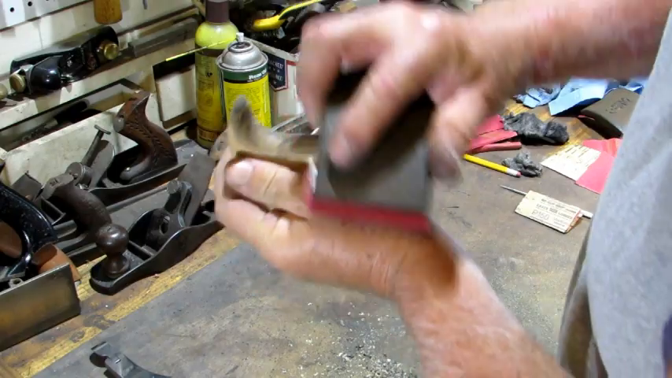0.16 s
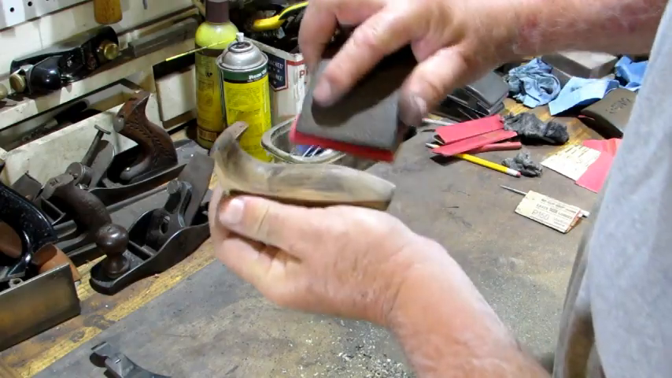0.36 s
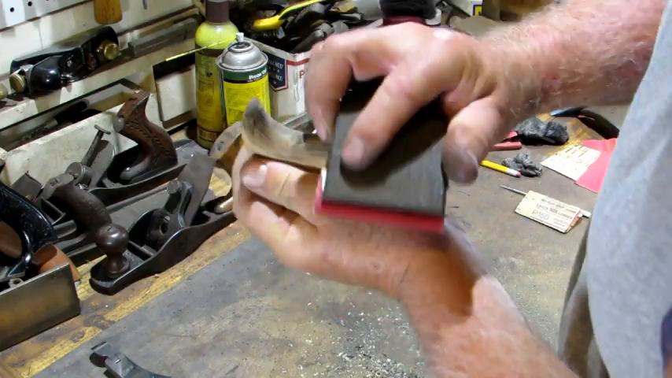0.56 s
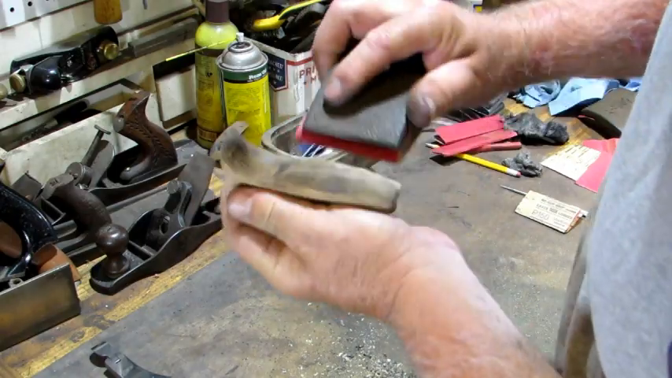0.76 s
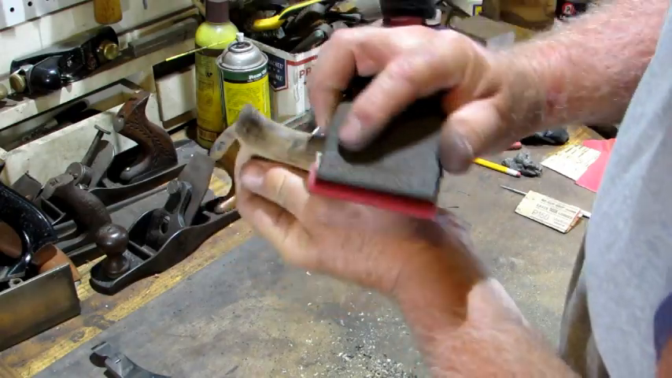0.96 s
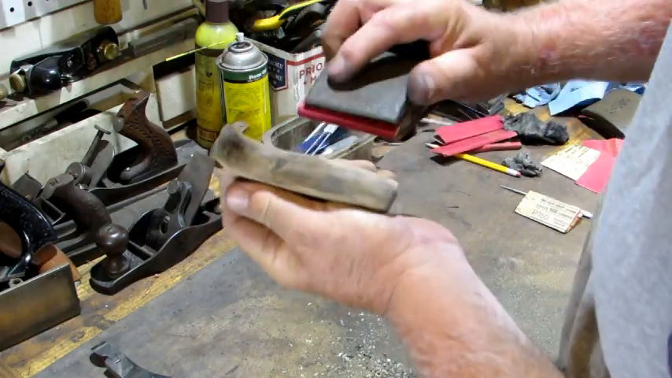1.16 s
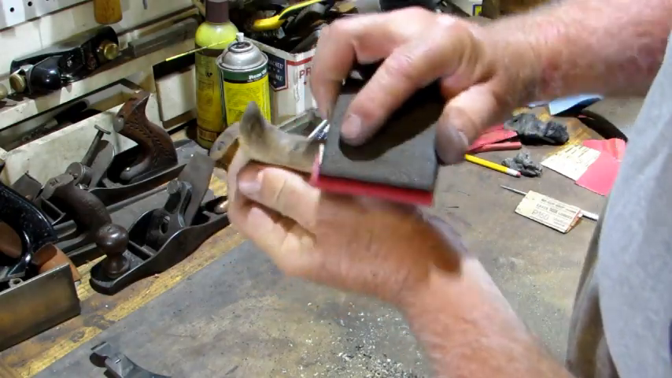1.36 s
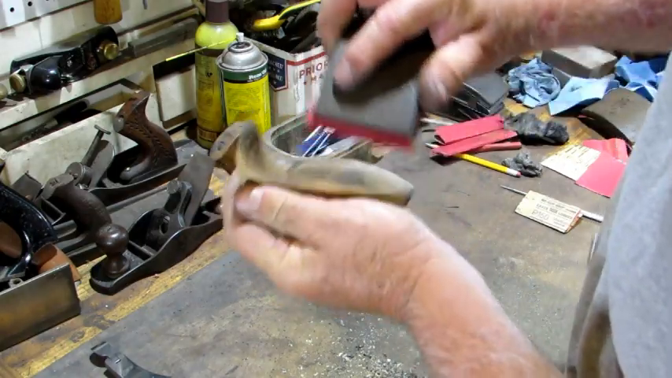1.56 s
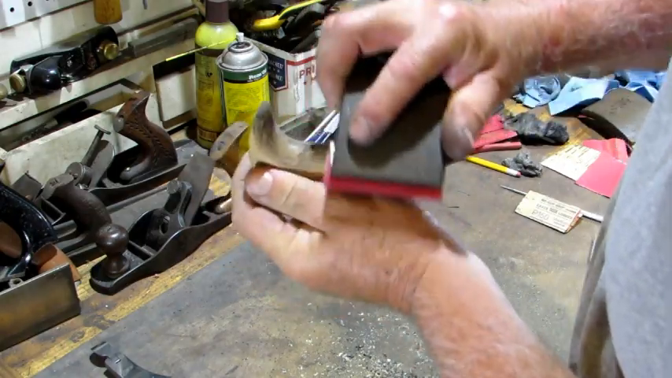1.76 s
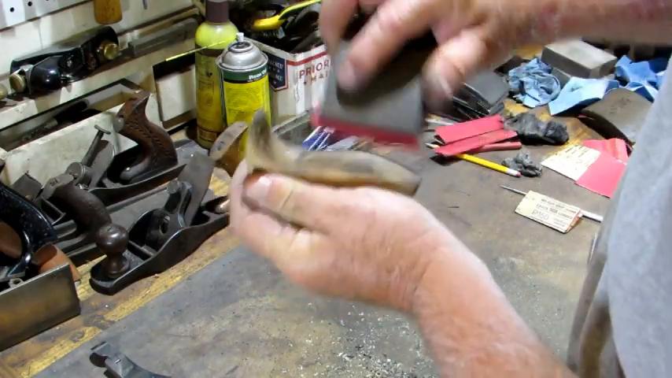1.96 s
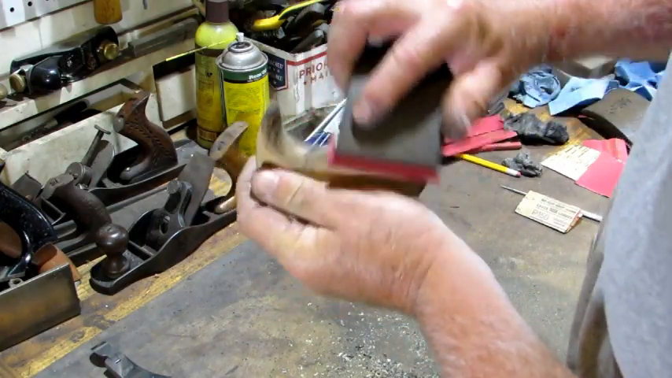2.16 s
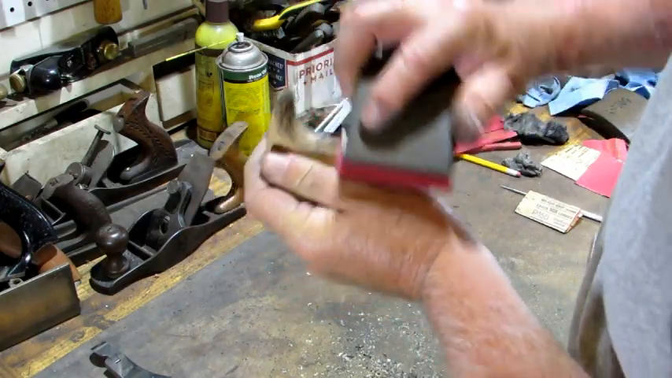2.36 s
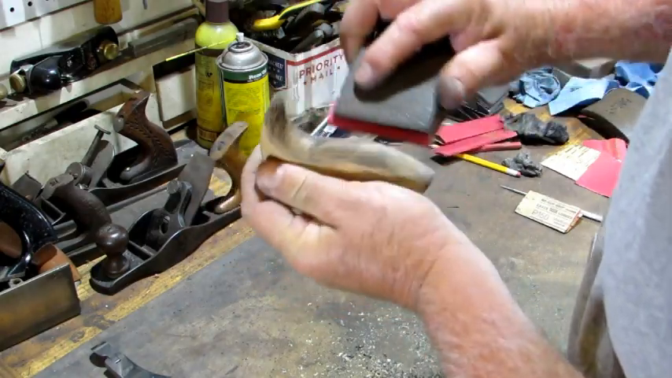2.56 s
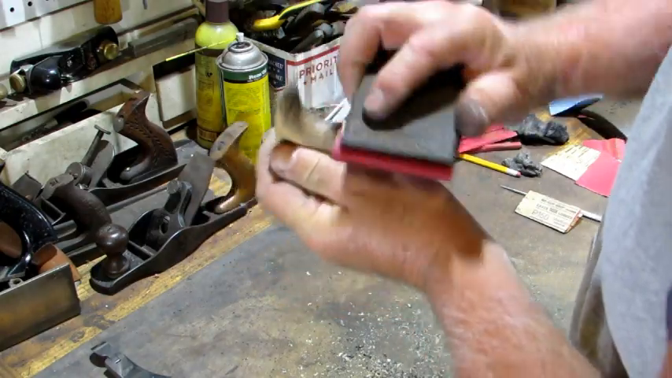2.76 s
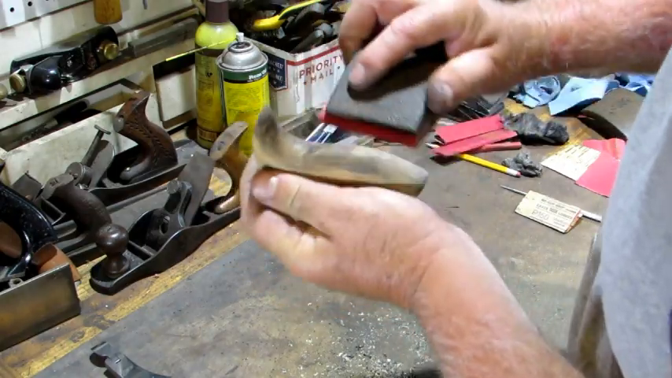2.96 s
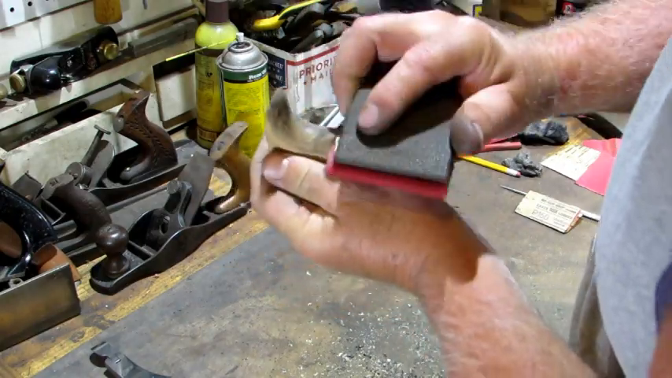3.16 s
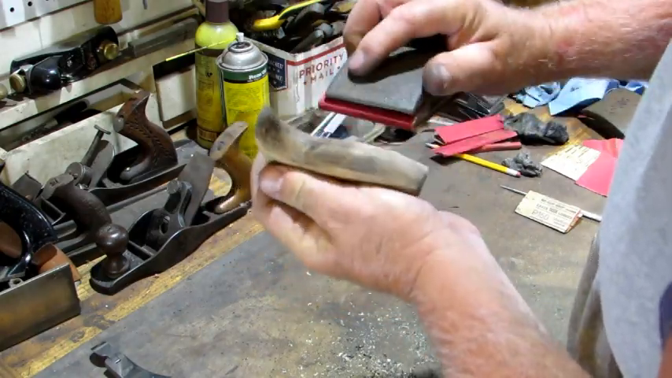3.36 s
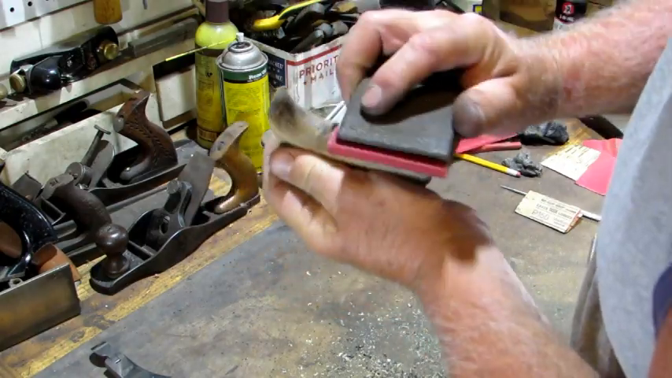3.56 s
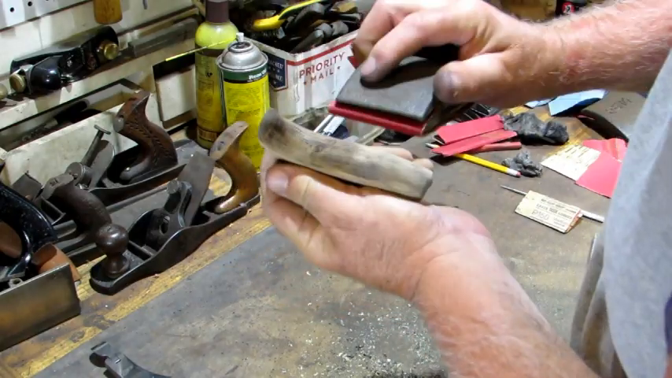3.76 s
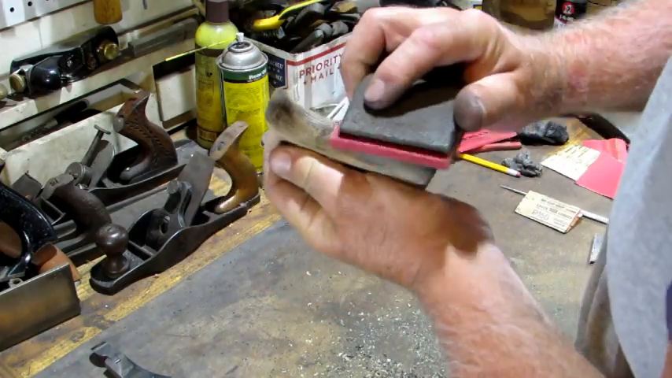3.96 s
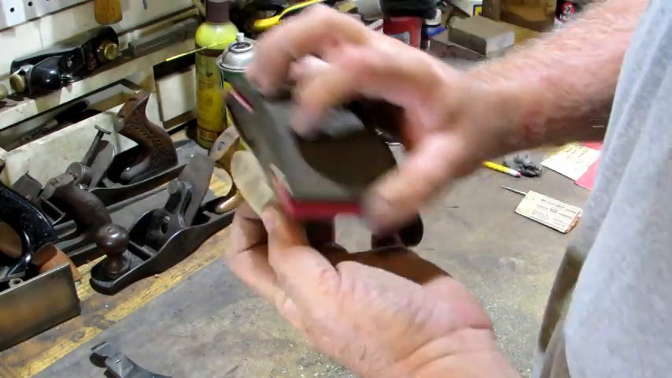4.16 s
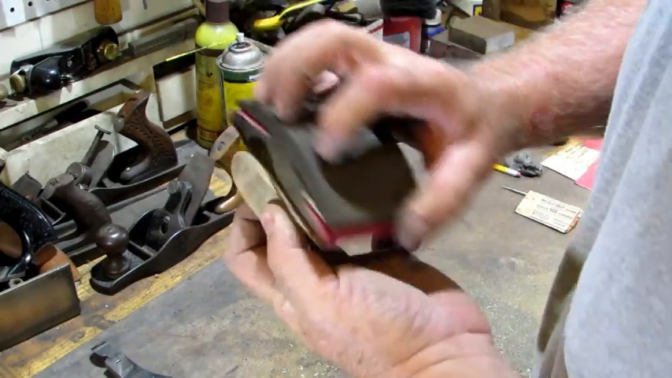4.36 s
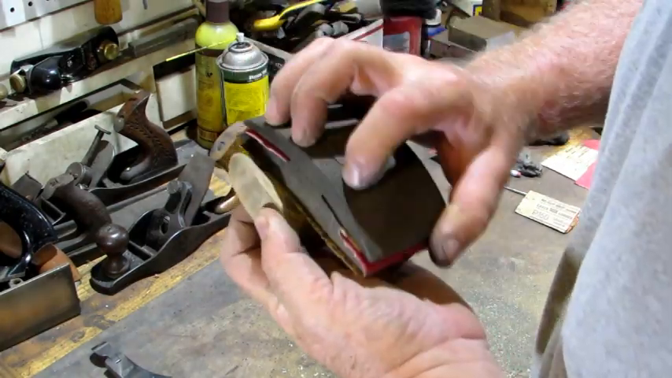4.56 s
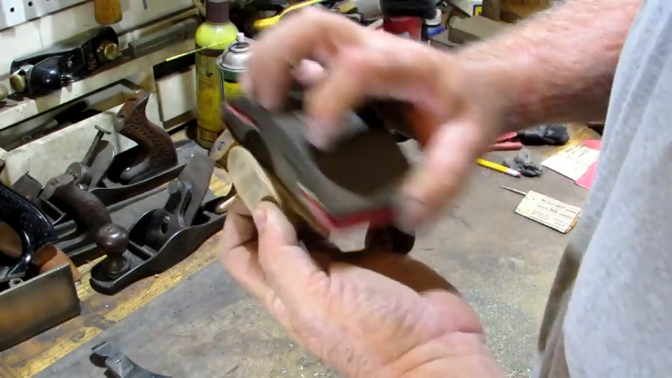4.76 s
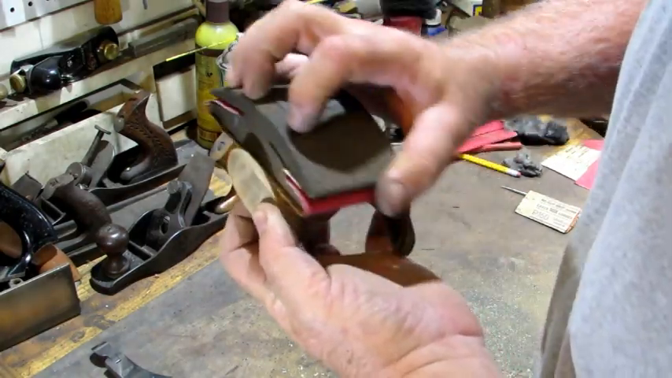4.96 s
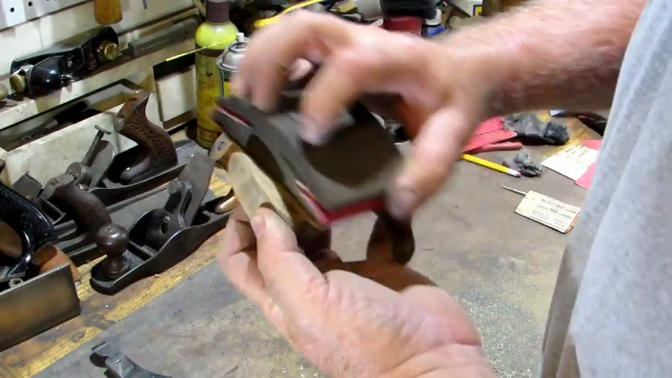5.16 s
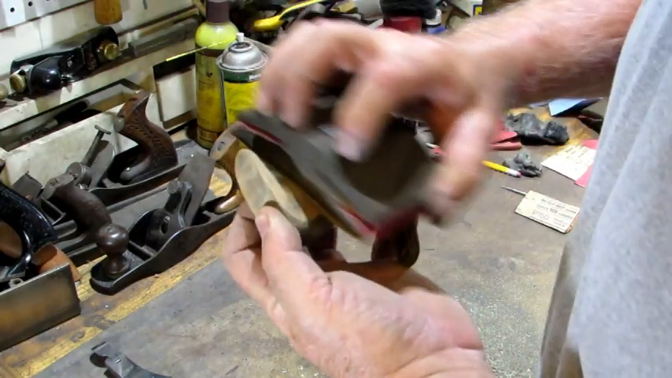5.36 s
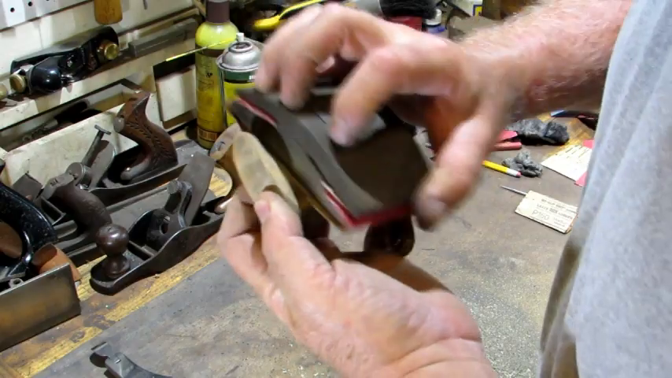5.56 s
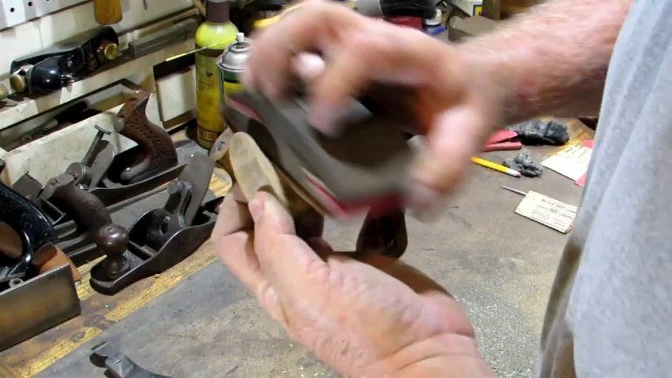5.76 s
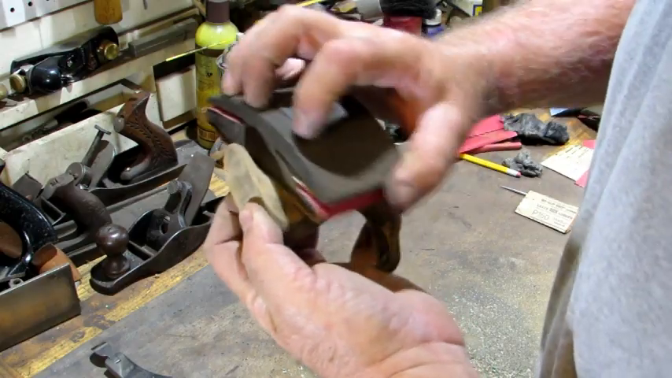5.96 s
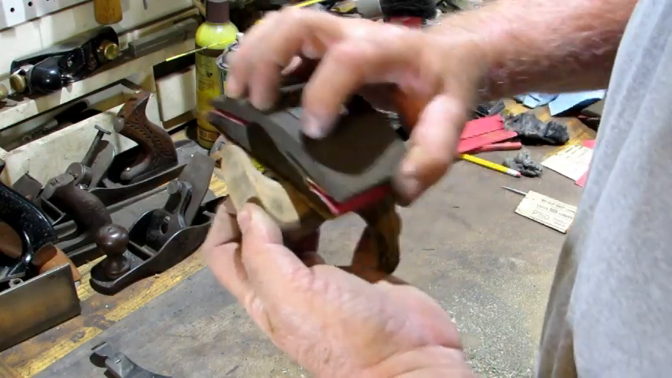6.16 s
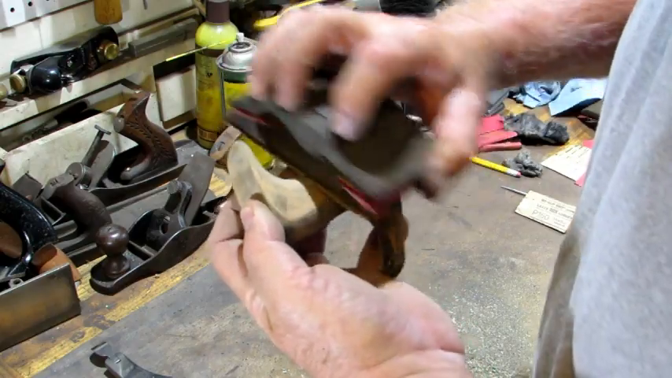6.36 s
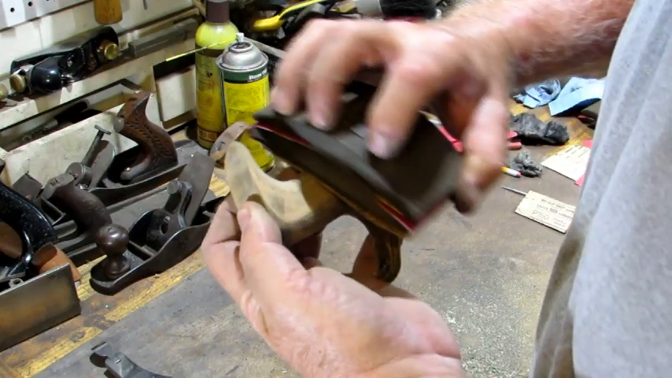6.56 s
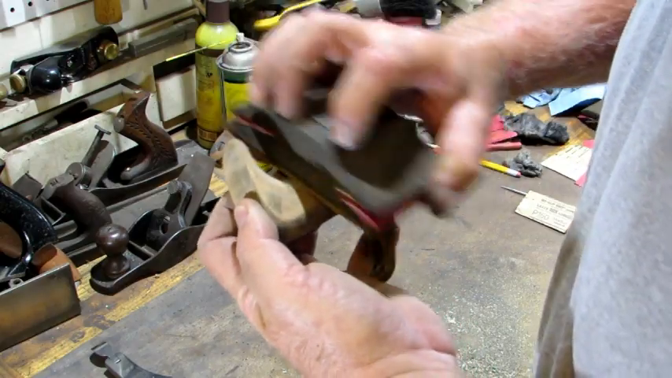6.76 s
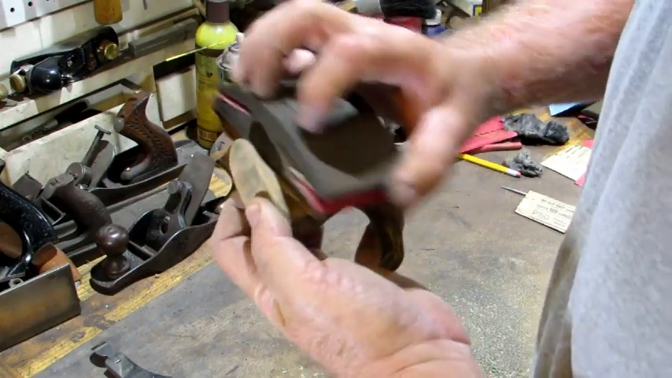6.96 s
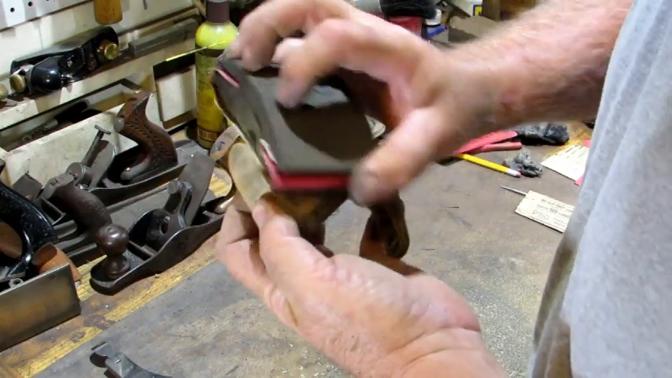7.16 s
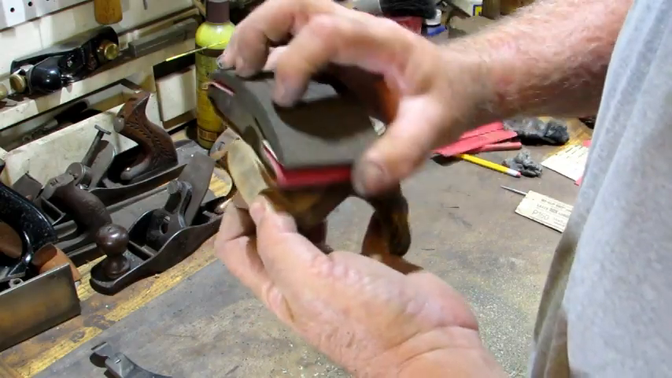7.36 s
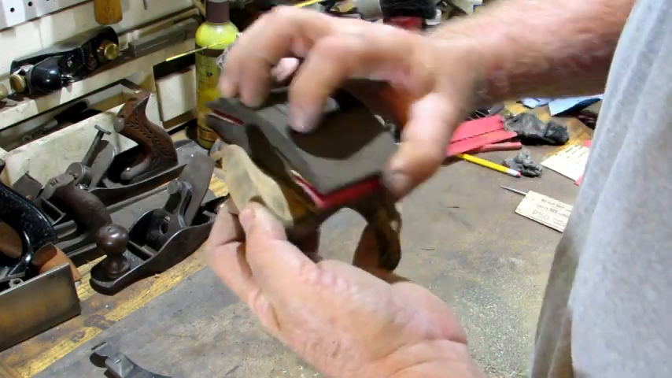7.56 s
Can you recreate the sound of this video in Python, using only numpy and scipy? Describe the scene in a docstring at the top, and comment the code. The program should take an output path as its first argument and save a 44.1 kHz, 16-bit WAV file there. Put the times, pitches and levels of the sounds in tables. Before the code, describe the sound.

Sandpaper on a rubber block rasps over hardwood in paired strokes, then abruptly switches to quick continuous scrubbing, above a steady fan hum.

```python
"""A small workshop, close to the hands: sandpaper on a rubber block rubs a hand-held piece of hardwood. A brief
stroke dies away, then pushes and pulls over the face come in pairs with short gaps, many opening with a knock
as the block lands; a hard cut, echo and all, leads to quick scrubbing on the edge. Random grains make a fine
hiss and a coarse rasp that rings at the wood's resonances. Noise tails answer from the walls, and a fan hums
throughout in tones over rushing air."""
import sys
import numpy as np
from scipy import signal
from scipy.fft import rfft, irfft, next_fast_len
from scipy.io import wavfile
from scipy.ndimage import uniform_filter1d, map_coordinates

SR = 44100
rng = np.random.default_rng(int(sys.argv[2]) if len(sys.argv) > 2 else 0)


def generate_wav(signal):
    """Clip the signal to [-1, 1] and save it as 16-bit WAV at the path in sys.argv[1]."""
    frames = np.transpose(np.atleast_2d(signal))
    scaled = np.clip(frames, -1, 1) * 32767
    pcm = np.round(scaled).astype(np.int16)
    wavfile.write(sys.argv[1], SR, pcm)


N = 336483

# passes over the face: push start t/s, pull start t/s, push force/dB, pull force/dB,
# push bite/dB, pull bite/dB (force is relative; bite is the hiss gained over the rasp)
FACE_STROKES = [(0.146, 0.251, -0.5, 2, -1, 0.5), (0.51, 0.621, -3, 0.9, 0, 2.5),
                (0.889, 0.994, 1, 0, 0, 0.5), (1.245, 1.356, 3, -1, 1.5, 0.5),
                (1.622, 1.725, 0.5, -2, -0.5, -1), (1.992, 2.104, 0.5, 1.5, 1, 1),
                (2.371, 2.479, -0.5, 3.5, 1.5, 0), (2.738, 2.836, -1.5, 1.5, -2.5, 1.5),
                (3.099, 3.198, -2, -1, 0, 1), (3.452, 3.565, 1, -2, 0, 1.5),
                (3.828, 3.948, 2.5, -2, -1, 2.5)]
# manner of a push over the face: rasp and hiss level/dB at usual force, hiss_follows (dB per dB of force),
# crest (0-1 of the stroke), sharpness of the swell, tilt (dB/octave), flare_db (tremble of the hand, dB)
FACE_PUSH_MANNER = dict(rasp_db=-26.6, hiss_db=-23.0, hiss_follows=0.3, rasp_crest=0.27, hiss_crest=0.18, rasp_sharp=1.23, hiss_sharp=1.5, rasp_tilt=-1.4, hiss_tilt=-0.8, flare_db=0.6)


def amp(db):
    """Decibels to gain."""
    return 10 ** (np.asarray(db) / 20)


def unit(x):
    """Scale to rms 1."""
    return x / np.sqrt(np.mean(x ** 2) + 1e-20)


def along(points, hz):
    """Read (f/Hz, value) points on a log frequency axis."""
    f, v = np.transpose(points)
    return np.interp(np.log(hz + 1), np.log(f + 1), v)


def wobble(rate, size):
    """A smooth random curve, rate knots a second."""
    knots = rng.standard_normal(int(size * rate / SR) + 4)
    return map_coordinates(knots, [np.arange(size) * rate / SR])


def filtered(x, response):
    """x shaped by a response of frequency."""
    size = x.shape[-1]
    m = next_fast_len(size + 2048)
    spectrum = rfft(x, m) * response(np.fft.rfftfreq(m, 1 / SR))
    return irfft(spectrum, m)[..., :size]


def stereo(pair, alike):
    """Mix two unrelated signals into left and right microphones of a given likeness."""
    turn = lambda hz: np.arccos(np.clip(along(alike, hz), 0, 1)) / 2
    mid, side = filtered(pair, lambda hz: np.array([np.cos(turn(hz)), np.sin(turn(hz))]))
    return np.array([mid + side, mid - side])


def add(track, s, sound):
    """Mix a sound into a track at time s."""
    start = int(np.clip(round(s * SR), 0, N))
    track[:, start:start + sound.shape[-1]] += sound[:, :N - start]


def fan(air_db, blade_db, hum_db):
    """A wavering blade tone and weaker motor and housing tones over rushing air."""
    # colour of the rush: f/Hz, relative density/dB per Hz
    air_colour = [(15, -42), (30, -17), (50, -15), (100, -12), (135, -18.5), (190, -7.5), (255, -1.5),
                  (370, -3.5), (500, -6.5), (610, -10.5), (820, -5.5), (1300, -10), (3000, -18),
                  (5500, -26.5), (14000, -40)]
    # likeness of the rush at the two microphones: f/Hz, likeness (0-1)
    air_alike = [(30, 0), (80, 0), (160, 0.13), (280, 0.96), (520, 0.49), (1100, 0.77), (3000, 0.58),
                 (10000, 0.4)]
    # pitch of the blade tone: t/s, f/Hz; the brief rise near 4.03 s stands for the phase jump at the cut
    blade_pitch = [(0.2, 335.3), (0.79, 335.8), (3.91, 335.7), (4.03, 338.4), (4.12, 336.8), (5.08, 336.8),
                   (5.15, 335.7), (7.6, 335.5)]
    # tones of the motor and housing: f/Hz, relative level/dB
    hum_tones = [(88, -68), (106, -61.5), (229.5, -50.5), (247.5, -43.5), (283, -47.5), (300, -47),
                 (390, -63), (425, -61), (495.6, -50), (511, -53.5), (531, -48.5), (654, -51), (878, -54.5),
                 (1099, -55)]
    t = np.arange(N) / SR
    rush = filtered(rng.standard_normal((2, N)), lambda hz: amp(along(air_colour, hz)))
    air = unit(stereo(rush, air_alike))
    turns = np.cumsum(np.interp(t, *np.transpose(blade_pitch))) / SR
    blade = amp(blade_db + 1.06 * wobble(4.05, N)) * np.sin(2 * np.pi * turns + 0.23 * wobble(5, N))
    hum = np.zeros(N)
    for hz, db in hum_tones:
        phase = 2 * np.pi * (hz * t + rng.random()) + 1.07 * wobble(3, N)
        hum += amp(db + hum_db) * np.sin(phase)
    left_db = -0.73  # the right microphone gains as much as the left loses
    return (amp(air_db) * air + blade + hum) * amp([[left_db], [-left_db]])


def workshop(x):
    """The walls answer 4 ms late with a diffuse decaying tail, its noise drawn afresh every third of a second."""
    # decay of the room: f/Hz, t60/s
    wall_decay = [(400, 0.29), (2500, 0.47), (6000, 0.49), (13000, 0.31)]
    # likeness of the answer at the two microphones: f/Hz, likeness (0-1)
    room_alike = [(500, 1), (3000, 0.76), (8000, 0)]
    out, hop = np.zeros((2, N)), SR // 3
    for start in range(0, N, hop):
        hz, t, z = signal.stft(rng.standard_normal((2, SR // 2)), SR, nperseg=256)
        t60 = along(wall_decay, hz)[:, None]
        tail = signal.istft(z * amp(-60 * t / t60), SR, nperseg=256)[1]
        tail = tail / np.linalg.norm(tail[0])
        add(out, start / SR + .004, signal.fftconvolve(x[None, start:start + hop], tail, axes=1))
    return stereo(out, room_alike)


def in_room(x, room_db):
    """The direct sound at both microphones, and the walls' answer."""
    # likeness of the direct sound at the two microphones: f/Hz, likeness (0-1)
    direct_alike = [(500, 1), (3000, 0.89), (6000, 0.92), (12000, 0.58)]
    return stereo(x, direct_alike) + amp(room_db) * workshop(x[0])


def landings(scatter_db, scatter_t60, gain_db, lowest_hz):
    """The rubber block meets the wood in one blow; the bench and tools scatter it back."""
    # the block lands on the wood: t/s, relative level/dB
    blows = [(0.1517, -14.5), (0.5196, -20), (0.8953, -18.5), (1.2462, -18.5), (2.378, -23),
             (2.7471, -10.5), (3.1037, -19), (3.4585, -21.5)]
    # modes of the struck wood, damped by the hand: f/Hz, typical level/dB, t60/s
    knock_modes = [(498, -8, 0.025), (756, -6, 0.012), (1140, -8, 0.0027), (1870, -11, 0.026),
                   (2765, -16.5, 0.12)]
    out, t = np.zeros((2, N)), np.arange(SR // 12) / SR
    for s, db in blows:
        ring = np.zeros(len(t))
        for hz, level, t60 in knock_modes:
            ring += amp(level + rng.normal(0, 1) - 60 * t / t60) * np.cos(2 * np.pi * hz * t)
        blow = amp(scatter_db - 60 * t / scatter_t60) * rng.standard_normal((2, len(t)))
        blow[0, 0] = 1  # the blow itself, ahead of its scatter
        add(out, s, amp(db + gain_db) * signal.fftconvolve(blow, ring[None], axes=1))
    # so small a piece radiates no bass, and rubber is too soft for a sharp tick
    softness_hz = 3500
    return filtered(out, lambda hz: (1j * hz / (lowest_hz + 1j * hz)) ** 2 / (1 + 1j * hz / softness_hz))


def grit(size, per_second, clump_db, clump_rate):
    """Grains snag and snap free at random; their sizes clump where the fibres catch."""
    snaps = rng.standard_normal((2, size)) * (rng.random(size) < per_second / SR)
    return snaps * amp(clump_db * wobble(clump_rate, size))


def first_touches(touch_db, t60):
    """Just before the block bears down for a push, the tips of the grains bite with a bright scratch."""
    # colour of the first touch: f/Hz, relative density/dB per Hz
    tip_colour = [(1000, -12), (2500, -1), (5000, -8), (9000, -3), (13000, 2.5)]
    out, t = np.zeros((2, N)), np.arange(SR // 20) / SR
    lead = .002  # s
    for start, _, force_db, _, bite_db, _ in FACE_STROKES:
        grains = grit(len(t), per_second=12000, clump_db=-0.5, clump_rate=590)
        tips = unit(filtered(grains, lambda hz: amp(along(tip_colour, hz))))
        level_db = touch_db + FACE_PUSH_MANNER["hiss_follows"] * force_db + bite_db
        add(out, start - lead, amp(level_db - 60 * t / t60) * tips)
    return out


def resonant(modes, hz):
    """A flat response lifted by ringing resonances."""
    return 1 + sum((amp(db) - 1) * 1j * hz * w / (c * c - hz * hz + 1j * hz * w) for c, w, db in modes)


def swell(size, crest, sharp, ease_in, ease_out):
    """Speed times pressure in one stroke: near 1 at the crest, with soft ends (ease times in s)."""
    u, c = (np.arange(size) + .5) / size, np.clip(crest, .05, .95)
    t = u * size / SR
    ease = np.tanh(t / ease_in) * np.tanh(t[::-1] / ease_out)
    return ease * ((u / c) ** c * ((1 - u) / (1 - c)) ** (1 - c)) ** sharp


def patchy(x, depth_db, band_count, frame_count):
    """As the contact slides along the wood, bands of the sound flare and fade."""
    z = signal.stft(x, nperseg=256)[2]
    field = uniform_filter1d(rng.standard_normal(z.shape[1:]), band_count, 0)
    field = uniform_filter1d(field, frame_count, 1)
    return signal.istft(z * amp(depth_db * unit(field)), nperseg=256)[1][:, :x.shape[-1]]


def stroke(length, force_db, bite_db, grip, rasp_db, hiss_db, hiss_follows, rasp_crest, hiss_crest,
           rasp_sharp, hiss_sharp, rasp_tilt, hiss_tilt, flare_db):
    """Coarse grains drive the wood, fine ones hiss; both grow with the force of the hand."""
    # broad colours: f/Hz, relative density/dB per Hz
    rasp_colour = [(300, -34), (700, -14.5), (1250, -13), (1700, -6.5), (2300, -3), (2900, 0.5),
                   (3600, -1.5), (4000, -6), (4700, -13)]
    hiss_colour = [(2000, -29), (3500, -15.5), (4400, -4.5), (6000, -4), (7500, -3), (8300, -6),
                   (10500, -6), (12600, -6)]
    bite_tilt = 0.53  # a keener bite also brightens the rasp: dB/octave per dB
    size = max(round(length * SR), 512)
    # the hand never holds the wood twice alike, so its resonances shift a little
    shift = 1 + 0.0068 * rng.standard_normal()

    def ring(x, colour, tilt):
        """Grains heard through the wood, brighter or duller with the angle of the block."""
        octaves = lambda hz: np.log2(np.maximum(hz / 1500, 1))
        tone = lambda hz: amp(along(colour, hz) + tilt * octaves(hz))
        return filtered(x, lambda hz: tone(hz) * resonant(grip, hz * shift))

    coarse = grit(size, per_second=8000, clump_db=0.55, clump_rate=304)
    fine = grit(size, per_second=18000, clump_db=0.5, clump_rate=560)
    rasp = ring(coarse, rasp_colour, rasp_tilt + bite_tilt * bite_db)
    hiss = ring(fine, hiss_colour, hiss_tilt)
    rasp = unit(patchy(rasp, depth_db=2.5, band_count=3, frame_count=8))
    hiss = unit(patchy(hiss, depth_db=2.5, band_count=4, frame_count=9))
    rasp *= amp(rasp_db + force_db) * swell(size, rasp_crest, rasp_sharp, ease_in=0.0035, ease_out=0.0051)
    hiss *= amp(hiss_db + hiss_follows * force_db + bite_db)
    hiss *= swell(size, hiss_crest, hiss_sharp, ease_in=0.00096, ease_out=0.0093)
    # the hand's pressure trembles within the stroke
    return amp(flare_db * wobble(49.5, size)) * (rasp + hiss)


def face_passes(opening_tail_s, opening_tail_db):
    """A brief stroke dies away; each push starts hard and fades, each pull rasps early and hisses late."""
    # resonances of wood and block in each direction: f/Hz, width/Hz, lift/dB
    push_grip = [(1690, 97, 7.5), (1926, 41, 2), (2670, 84, 10), (3014, 68, 5.5), (3150, 150, 2.5),
                 (4640, 73, 8), (5020, 130, 3.5), (7230, 320, 4)]
    pull_grip = [(1774, 210, 10.2), (1920, 76, 7.8), (2466, 85, 9.6), (2920, 75, 0.98), (3310, 160, 6.2),
                 (3510, 270, 6.7), (5340, 250, 3.1), (7500, 450, 2)]
    # manner of a pull, same entries as the push
    pull_manner = dict(rasp_db=-27.5, hiss_db=-23.5, hiss_follows=0.25, rasp_crest=0.2, hiss_crest=0.78, rasp_sharp=1.3, hiss_sharp=1.24, rasp_tilt=-0.35, hiss_tilt=1.46, flare_db=0.75)
    push_s, pull_s = 0.096, 0.118  # stroke lengths
    out = np.zeros((2, N))
    # as the scene opens, a brief stroke dies away, shaped like a push but ringing at the pull's resonances
    opening_tail = stroke(opening_tail_s, 0, 0, pull_grip, **FACE_PUSH_MANNER)
    add(out, 0, amp(opening_tail_db) * opening_tail)
    for push, pull, push_db, pull_db, push_bite_db, pull_bite_db in FACE_STROKES:
        add(out, push, stroke(push_s, push_db, push_bite_db, push_grip, **FACE_PUSH_MANNER))
        add(out, pull, stroke(pull_s, pull_db, pull_bite_db, pull_grip, **pull_manner))
    return out


def edge_scrubs():
    """The block stays on the edge; a stroke is cut short when the hand turns round early."""
    # scrubs there and back: push start t/s, pull start t/s, push force/dB, pull force/dB (relative)
    scrubs = np.array([(4.033, 4.143, -4, -3), (4.268, 4.383, -2, -2), (4.505, 4.628, 0.5, 1.5),
                       (4.749, 4.875, 0.7, 2), (4.994, 5.121, 0.5, -0.5), (5.247, 5.376, 1, 2),
                       (5.498, 5.606, -1, 1.3), (5.737, 5.86, 2, -1.1), (5.987, 6.114, 1, 0),
                       (6.243, 6.36, 0.8, 0.5), (6.489, 6.617, 1, 1.4), (6.731, 6.845, 0.3, 2),
                       (6.966, 7.067, -0.5, 1.9), (7.194, 7.299, -0.2, 0.1), (7.413, 7.538, 3, -2)])
    # how keenly the paper bites as the block rolls over the edge: t/s, hiss gained over the rasp/dB
    bite = [(4.05, 1), (4.5, 0), (4.68, 1), (4.8, 1.5), (4.92, 2), (5.25, -2.5), (5.7, 0), (6.2, -3),
            (6.7, 0), (7.3, -1), (7.6, -1)]
    # resonances of wood and block in each direction: f/Hz, width/Hz, lift/dB
    push_grip = [(1884, 58, 9.2), (1980, 69, 3), (2180, 64, 10), (2440, 51, 7), (2745, 68, 10.8),
                 (2880, 53, 4.1), (3020, 81, 7), (3580, 61, 2.9), (4630, 540, 4.6), (5080, 69, 7.3)]
    pull_grip = [(1840, 58, 5.4), (2160, 180, 2.3), (2560, 65, 2.7), (2970, 59, 3.5), (3275, 150, 6),
                 (3690, 120, 4.2), (4650, 500, 2.2), (5140, 420, 5), (7250, 180, 1.8)]
    # manner of each direction, same entries as on the face
    push_manner = dict(rasp_db=-23.4, hiss_db=-23.5, hiss_follows=1, rasp_crest=0.5, hiss_crest=0.41, rasp_sharp=1.2, hiss_sharp=1.9, rasp_tilt=0.35, hiss_tilt=1.4, flare_db=0.7)
    pull_manner = dict(rasp_db=-27, hiss_db=-24, hiss_follows=1, rasp_crest=0.39, hiss_crest=0.5, rasp_sharp=1.17, hiss_sharp=2.2, rasp_tilt=0.11, hiss_tilt=0.46, flare_db=1.05)
    longest_s, turn_s = 0.1, 0.022  # longest stroke; shortest pause while the hand turns round
    out = np.zeros((2, N))
    starts, forces = scrubs[:, :2].ravel(), scrubs[:, 2:].ravel()
    lengths = np.minimum(longest_s, np.diff(starts, append=np.inf) - turn_s)
    directions = [(push_grip, push_manner), (pull_grip, pull_manner)] * len(scrubs)
    for start, length, force_db, (grip, manner) in zip(starts, lengths, forces, directions):
        bite_db = np.interp(start + length / 2, *np.transpose(bite))
        add(out, start, stroke(length, force_db, bite_db, grip, **manner))
    return out


def scene():
    """Sanding close by, first the face and then the edge, with its echo and the fan."""
    face = face_passes(opening_tail_s=0.08, opening_tail_db=-14)
    contacts = first_touches(touch_db=-20.0, t60=0.11)
    knocks = landings(scatter_db=-29, scatter_t60=.05, gain_db=4.5, lowest_hz=220)
    splice_s = 4.03  # here the sanding of the face breaks off, echo and all
    before_splice = np.arange(N) / SR < splice_s
    face_sanding = before_splice * in_room(face + contacts + knocks, room_db=-5.5)
    edge_sanding = in_room(edge_scrubs(), room_db=-5.5)
    return face_sanding + edge_sanding + fan(air_db=-34.5, blade_db=-32.5, hum_db=1.2)


def record(dry):
    """The camera cuts two narrow notches, rolls off the top and keeps nothing above its band limit."""
    # narrow notches: f/Hz, width/Hz
    notch_bands = [(3945, 246), (7885, 190)]
    # treble roll-off: f/Hz, level/dB
    roll_off = [(12700, 0), (13500, -3.5), (14000, -7.5), (14500, -12.5), (15000, -18), (15300, -27),
                (15600, -45)]
    top_hz = 15650

    def response(hz):
        """Notches, roll-off and band limit together."""
        cuts = [(c * c - hz * hz) / (c * c - hz * hz + 1j * hz * w) for c, w in notch_bands]
        return np.prod(cuts, axis=0) * amp(along(roll_off, hz)) * (hz < top_hz)

    return filtered(dry, response)


dry = scene()
out = record(dry)
generate_wav(out)
```